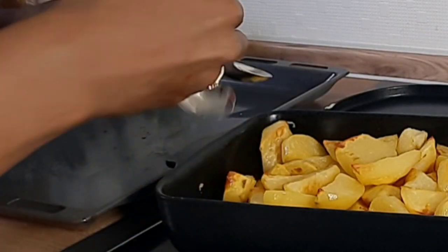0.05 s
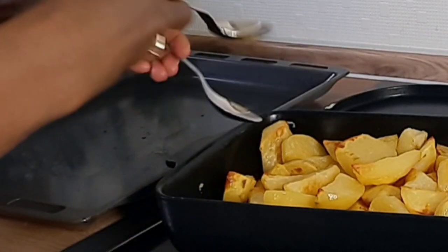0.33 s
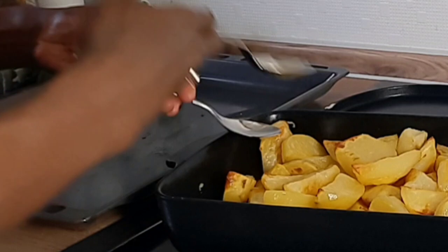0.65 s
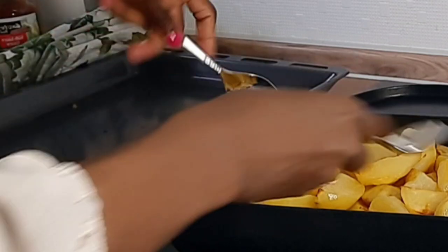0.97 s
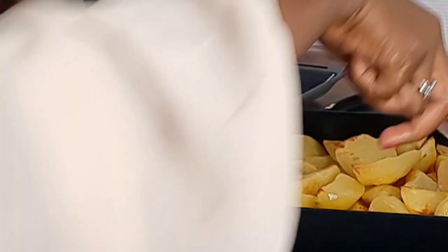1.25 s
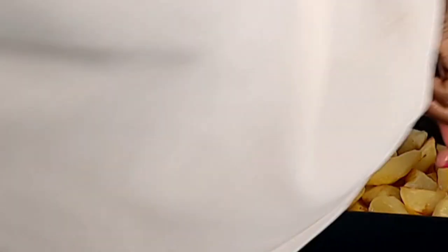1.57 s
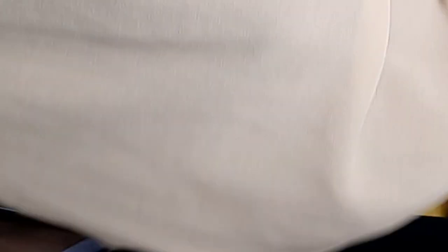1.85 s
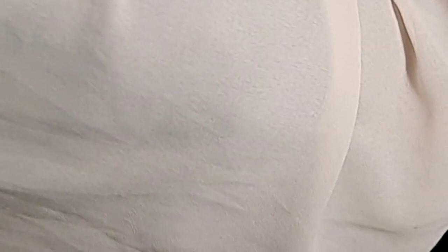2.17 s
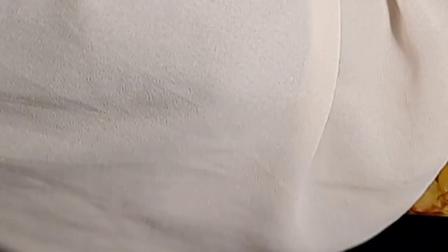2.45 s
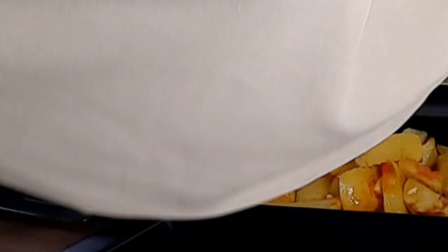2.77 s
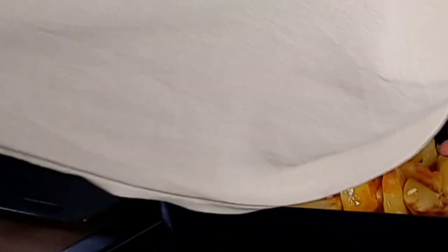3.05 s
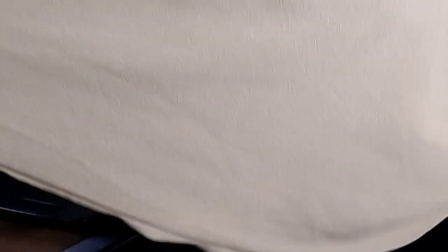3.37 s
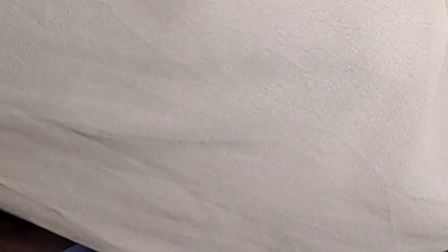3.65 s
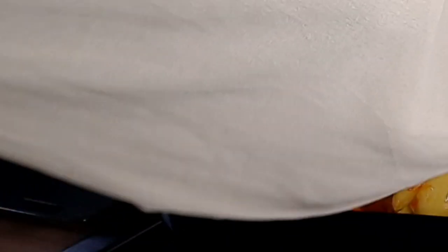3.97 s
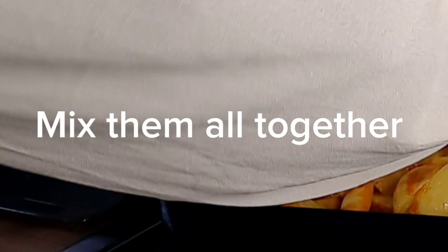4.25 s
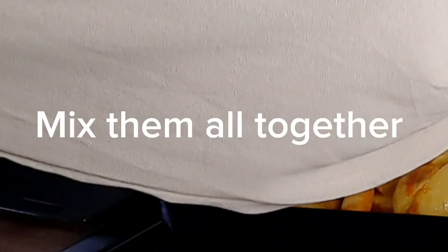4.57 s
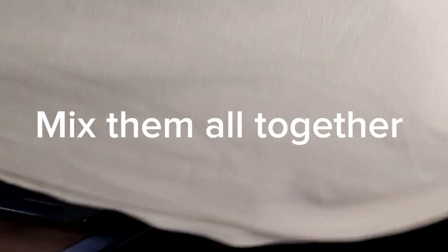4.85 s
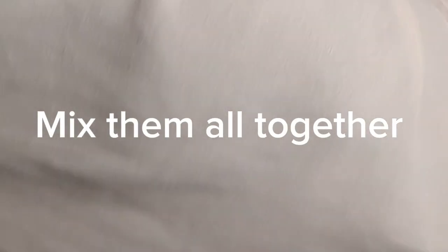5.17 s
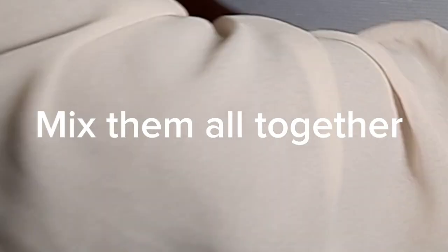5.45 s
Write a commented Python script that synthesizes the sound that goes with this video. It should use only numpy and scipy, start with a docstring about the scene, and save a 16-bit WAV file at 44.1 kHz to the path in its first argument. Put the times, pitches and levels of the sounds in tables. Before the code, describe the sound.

Two steel spoons clank and scrape in a metal oven tray, tossing roast potatoes in a small kitchen.

```python
"""Two steel spoons toss roast potatoes in a metal oven tray, in a small kitchen.
Each clank shakes the sheet metal and rings the tray and both spoons; crossing handles ring thinly.
Stick-slip pulses make the spoons scrape along the tray floor, and potatoes tumble and land softly.
The tray bumps once on the hob, which booms, and there is one sharp, thin snap.
Behind it are two faint sleeve swishes and a steady room tone."""
import sys
import numpy as np
from scipy import signal
from scipy.fft import rfft, irfft, next_fast_len
from scipy.io import wavfile
from scipy.ndimage import uniform_filter1d

SR = 44100
rng = np.random.default_rng(int(sys.argv[2]) if len(sys.argv) > 2 else 0)


def generate_wav(sig):
    """Save sig (samples, or channels by samples) to the path in sys.argv[1] as 16-bit PCM at SR."""
    pcm = np.round(np.clip(np.atleast_2d(sig).T, -1, 1) * 32767).astype(np.int16)
    wavfile.write(sys.argv[1], SR, pcm)


N = 242991
BLOW_TIME_S = np.arange(int(SR * .4), dtype=np.float32) / SR

# Spoon blows: (time [s], level [dB], place along wall [0-1], nominal tray t60 [s],
# knock trim [dB], clang trim [dB], first spoon trim [dB], second spoon trim [dB], treble trim [dB])
SPOON_BLOWS = [ (0.573, -14.5, .068, 0.35, -25, -3.5, -17.5, -17.5, -21.5),
               (0.656, -11.5, .06, 0.12, -30.5, -10, -16.5, -17, -23.5),
               (1.068, -28, .202, 0.26, -20.5, 10.5, -15, -37, -12.5),
               (1.254, -42.5, .06, 0.13, -32, 12.5, -10, -33, -30),
               (1.389, -23.5, .068, 0.2, -15, 3, -34, -38, -8),
               (1.452, -17.5, .43, 0.11, -23.5, -4, -15, -39, -25),
               (1.550, -13, .06, 0.2, -24, -9.5, -17, -42, -19),
               (2.709, -7.5, .332, 0.2, -28.5, 2.5, -8, -14, -13.5),
               (2.809, -7, .06, 0.3, -23.5, -19, .5, -24, -15),
               (2.900, -20, .066, 0.26, -19.5, -27, -6.5, -34, -16),
               (3.006, -10, .062, 0.076, -22.5, -15, -12.5, -17.5, -23.5),
               (3.167, -29.5, .06, 0.68, -48, 4, -32, -36, -17),
               (3.335, -28.5, 0, 0.12, -17, 0.5, -26, -34, -24),
               (4.408, -7.5, 0.23, 0.27, -25, -1.5, -9, -7, -29),
               (4.502, -16, .402, 0.072, -31.5, -5, -18, -11.5, -23.5),
               (4.589, -11, .292, 0.082, -34.5, -12, -16.5, -11.5, -39),
               (4.643, -24, .066, 0.18, -16, -17, -19, -30, -8),
               (4.726, -17.5, .074, 0.029, -15.5, -34, -32, -12.5, -20.5),
               (4.862, -23.5, .068, 0.055, -28, -36, -40, -10, -14),
               (5.282, -21.5, .058, .095, -28, -.5, -35, -42, -22)]
# Spoon and tray floor modes: (frequency [Hz], level [dB], t60 [s])
FIRST_SPOON_MODES = [(3104, 0, .25), (3130, -2, .17), (3340, -14, .2), (5608, -10, .14), (6710, -11, .25),
                     (6848, -15, .18), (7230, -13, .22), (8702, -22, .26), (10985, -23, .15),
                     (11990, -19, .15)]
SECOND_SPOON_MODES = [(2462, -7, .22), (3413, -6, .27), (4258, 0, .17), (4236, -5, .11), (5582, -8, .2),
                      (6675, -16, .22), (7300, -13, .2), (8200, -25, .18)]
FLOOR_MODES = [(338.8, -4.5, 0.18), (429.7, 2, .28)]
# Floor knock and contact crack spectra: (frequency [Hz], level [dB])
KNOCK_SPECTRUM = [(60, -15), (200, -11), (320, 1.5), (430, 0), (560, -8.5), (800, -11.5), (1400, -10),
                  (4000, -63.5)]
TREBLE_SPECTRUM = [(3000, -25.5), (7000, 8.5), (8300, 2), (9500, -9.5), (11500, 1), (13500, -7),
                   (15500, -8.5)]
def spoon_clanks():
    """Each contact cracks, shakes the sheet metal and rings the tray and both spoons."""
    out = np.zeros((2, N))
    metal = sheet_metal(ripple_db=7)
    swell = 1 - np.exp(-BLOW_TIME_S / 0.0005)  # ringing builds while the spoon chatters
    for time_s, db, place, t60_s, knock_db, clang_db, first_db, second_db, treble_db in SPOON_BLOWS:
        sheet = unit_onset(burst(metal, t60_s / 2) + amp(5.5) * burst(metal, t60_s=0.023))
        knock = unit_onset(burst(KNOCK_SPECTRUM, t60_s=0.14, attack_s=0.0026)
                           + amp(-6) * ring(FLOOR_MODES))
        treble = unit_onset(burst(TREBLE_SPECTRUM, t60_s=0.043))
        impact = amp(-8) * sheet + amp(knock_db) * knock + amp(treble_db) * treble
        impact = reverberate(impact, kitchen_tail(), wet_db=-2)
        clang = amp(clang_db - 10) * unit_onset(ring(struck_tray_modes(place, t60_s)))
        first = amp(first_db - 0.5) * unit_onset(ring(FIRST_SPOON_MODES))
        second = amp(second_db + 2.5) * unit_onset(ring(SECOND_SPOON_MODES))
        add(out, time_s, amp(db - 8.5) * (impact + swell * (clang + first + second)))
    return out


# Sheet metal spectrum: (frequency [Hz], level [dB])
SHEET_SPECTRUM = [(200, -32.5), (750, -16.5), (1100, 4), (1600, 0), (2500, 3), (3500, 2.5), (4800, -4.5),
                  (7200, -9), (8500, -43), (11000, -39)]
def sheet_metal(ripple_db):
    """The tray's crowded resonances, as random ripple on its broad spectrum."""
    hz = np.geomspace(200, 11000, 220)
    level_db = log_interp(SHEET_SPECTRUM, hz) + ripple_db * rng.standard_normal(len(hz))
    return np.transpose([hz, level_db])


# Tray wall modes: (frequency [Hz], level [dB], reference t60 [s])
TRAY_MODES = [(1030, -10, .2), (1135, -3, .25), (1219, -2, .22), (1285, -5, .2), (1402, 0, .24),
              (1470, 0, .22), (1525, -3, .22), (1870, -10, .16), (2080, -13, .15), (2400, -13, .2)]
def struck_tray_modes(place, t60_s, reference_t60_s=0.23):
    """A blow favours the modes that swing widely where it lands."""
    modes = []
    for half_waves, (hz, db, mode_t60_s) in enumerate(TRAY_MODES, start=4):
        coupling = 0.13 + abs(np.cos(np.pi * half_waves * place))
        modes.append((hz, db + 20 * np.log10(coupling), mode_t60_s * t60_s / reference_t60_s))
    return modes


# Spoon-on-spoon contacts: (time [s], level [dB])
HANDLE_CONTACTS = [(0.575, -25), (0.654, -26.5)]
# Handle modes: (frequency [Hz], level [dB], t60 [s])
HANDLE_MODES = [(3112, 0, .2), (3811, -15, .24), (4242, -6, .12), (5865, -11, .25), (10764, -22, .24),
                (11601, -17, .2), (15213, -20, .2)]
def handle_rings():
    """The spoons cross and set their thin handles ringing."""
    out = np.zeros((2, N))
    swell = 1 - np.exp(-BLOW_TIME_S / 0.0061)
    for time_s, db in HANDLE_CONTACTS:
        add(out, time_s, amp(db) * unit_onset(ring(HANDLE_MODES) * swell))
    return out


# Spoon pushes: (peak time [s], rise [s], fall [s], level [dB], hiss trim [dB], tumble trim [dB])
SPOON_STROKES = [ (1.2, 0.11, 0.29, -50.5, -24, -19), (1.721, 0.19, 0.27, -44.5, -12, -3),
                 (1.885, 0.12, 0.057, -33.5, 0, -17), (1.994, 0.3, 0.06, -40.5, -7, -12),
                 (2.27, 0.097, .36, -65, -6.5, -5), (2.69, 0.3, 0.15, -59.5, -0.5, -22),
                 (3.12, 0.038, 0.13, -40.5, -21, -26), (3.221, 0.1, 0.11, -35.5, 1.5, -41),
                 (3.265, 0.064, 0.096, -31, -14, -52), (3.50, 0.11, 0.1, -44, -15.5, -9),
                 (4.78, 0.038, 0.094, -40, -22, -14), (4.885, .11, 0.064, -34, -4.5, -10.5),
                 (5.182, 0.28, 0.25, -48.5, -9.5, -14.5), (5.38, 0.13, 0.6, -58.5, -2.5, -10.5)]
# Spoons rubbing in the food: (start [s], end [s])
RUB_SPANS = [(1.13, 3.58), (4.45, 7.7)]
def stroke_gains(drop_db=24, lift_s=0.079):
    """Scrape, hiss and tumble gains: each push swells and eases off over a light, steady rub."""
    t = np.arange(N) / SR
    in_food = sum(np.clip(np.minimum(t - start_s, end_s - t) / lift_s + 1, 0, 1)
                  for start_s, end_s in RUB_SPANS)
    power = np.outer(amp([-63, -68, -72]), in_food) ** 2
    for peak_s, rise_s, fall_s, db, hiss_db, tumble_db in SPOON_STROKES:
        push = amp(db - drop_db * np.maximum((peak_s - t) / rise_s, (t - peak_s) / fall_s))
        power += np.outer([1, amp(hiss_db), amp(tumble_db)], push) ** 2
    return np.sqrt(power)


# Scraped tray resonances: (frequency [Hz], bandwidth [Hz], level [dB])
SCRAPE_RESONANCES = [(990, 95, -1), (1850, 350, -3.5), (2604, 150, -3.5), (2892, 35, -2), (3080, 60, -3),
                     (3412, 36, -4.5), (3750, 90, -6), (4170, 46, -6), (4470, 130, -8), (4770, 190, -11.5),
                     (6540, 20, -21), (6410, 77, -8), (7090, 29, -31.5), (7380, 47, -10)]
# Scrape hiss spectrum: (frequency [Hz], level [dB])
HISS_SPECTRUM = [(2500, -29.5), (5000, 3.5), (6000, 2.5), (7300, 3), (9300, -21), (11000, -7),
                 (15500, -15.5)]
def spoon_scrapes():
    """A dragged spoon's slips ring the tray floor; potatoes roll ahead of it."""
    scrape_gain, hiss_gain, tumble_gain = stroke_gains()
    grit = moving_contact(stick_slip(rate_hz=600, spread_db=3.3), depth_db=5.5)
    metal = unit_rms(filtered(grit, lambda hz: resonances(SCRAPE_RESONANCES, hz)))
    scrape = scrape_gain * (amp(-3) * metal + amp(-23) * coloured(grit, KNOCK_SPECTRUM))
    hiss = amp(-4) * hiss_gain * coloured(grit, HISS_SPECTRUM)
    tumble = tumble_gain * coloured(stick_slip(rate_hz=60, spread_db=2), POTATO_SPECTRUM)
    return reverberate(scrape + hiss + tumble, kitchen_tail(), wet_db=-3.5)


def stick_slip(rate_hz, spread_db, rub_gain=.4):
    """Irregular friction pulses of uneven size over a smooth rub."""
    slips = rng.random(N) < rate_hz / SR
    sizes = amp(spread_db * np.minimum(rng.exponential(size=N), 4))
    pulses = unit_rms(slips * sizes * rng.choice([-1, 1], (2, N)))
    return diffuse(pulses + rub_gain * rng.standard_normal((2, N)))


def moving_contact(x, depth_db):
    """The moving contact favours changing resonances: random gain over frequency and time."""
    spectra = signal.stft(x, nperseg=1024)[2]
    patches = uniform_filter1d(rng.standard_normal(spectra.shape[1:]), size=3, axis=0)
    patches = unit_rms(uniform_filter1d(patches, size=4, axis=1))
    return unit_rms(signal.istft(spectra * amp(depth_db * patches), nperseg=1024)[1][:, :N])


# Potato landings: (time [s], level [dB])
POTATO_LANDINGS = [(1.573, -37), (3.03, -47.5), (3.146, -49), (3.35, -48.5), (4.441, -54), (4.652, -53),
                   (4.74, -56.5), (4.79, -53.5)]
# Potato thud and tumble spectrum: (frequency [Hz], level [dB])
POTATO_SPECTRUM = [(30, -31.5), (75, 1), (150, -3.5), (230, -4.5), (330, 2.5), (500, -5.5), (900, -10.5),
                   (3000, -34)]
def potato_thuds():
    """Soft potatoes drop onto the tray floor."""
    out = np.zeros((2, N))
    for time_s, db in POTATO_LANDINGS:
        thud = burst(POTATO_SPECTRUM, t60_s=0.22, attack_s=0.0012)
        add(out, time_s, amp(db) * unit_onset(reverberate(thud, kitchen_tail(), wet_db=0.5)))
    return out


# Hob modes: (frequency [Hz], level [dB], t60 [s])
HOB_MODES = [(75, 2, .27), (88, 7.5, .17), (121, 0, .35), (152, 2, .26), (188, -1, .25), (262, -7, .15),
             (303, -8, .45), (328, 3, .17), (452, -20, .24), (553, -4.5, .2), (736, -4, .2),
             (780, 3.5, .11)]
# Tray-on-hob clack spectrum: (frequency [Hz], level [dB])
CLACK_SPECTRUM = [(45, -33.5), (88, -1), (150, -22), (222, -11.5), (303, -8.5), (354, -12.5), (805, -15.5),
                  (905, -15), (1830, -19.5), (2400, -23), (3840, -23), (9260, -35), (14200, -24.5),
                  (16000, -66.5)]
def hob_bump(time_s=0.725, radiation_cutoff_hz=68):
    """The loaded tray knocks on the hob, which booms; a brief hiss follows as it slides."""
    out = np.zeros((2, N))
    tail = kitchen_tail()
    boom = ring(HOB_MODES, scatter_db=1.5) * (1 - np.exp(-BLOW_TIME_S / 0.0036))
    boom = highpass(boom, radiation_cutoff_hz, order=5)
    clack = burst(CLACK_SPECTRUM, t60_s=0.21) + amp(1.5) * burst(CLACK_SPECTRUM, t60_s=0.0055)
    contact = burst([(250, -16.5), (800, 1), (3000, 2), (7000, -20), (11000, -45.5)], t60_s=0.04)
    slide = burst([(6000, -27), (11000, -2), (14000, -0.5)], t60_s=0.22, attack_s=.02)
    add(out, time_s, amp(-20.5) * unit_onset(reverberate(boom, tail, wet_db=-22)))
    add(out, time_s, amp(-23) * unit_onset(reverberate(clack, tail, wet_db=1.5)))
    add(out, time_s, amp(-25) * unit_onset(contact))
    add(out, time_s + 0.012, amp(-31) * unit_onset(slide))
    return out


# Snap spectrum: (frequency [Hz], level [dB])
SNAP_SPECTRUM = [(410, -70), (700, -44), (922, -28), (1080, -33), (1480, -23), (2000, -27), (2530, -10),
                 (2770, -10.5), (3550, 0), (4380, -15), (7010, -10), (9480, -21), (14600, -13),
                 (16000, -20)]
def snap(time_s=3.803):
    """A thin, very short snap that leaves a faint ring."""
    out = np.zeros((2, N))
    crack = burst(SNAP_SPECTRUM, t60_s=0.1) + amp(-7) * burst(SNAP_SPECTRUM, t60_s=0.15)
    crack = unit_onset(reverberate(crack, kitchen_tail(), wet_db=-3))
    ringing = ring([(2660, -12.5, 0.9), (3219, 9.5, 0.32), (3580, -4, 0.66), (5650, -6, 0.43)])
    add(out, time_s, amp(-33.5) * crack + amp(-49.5) * ringing)
    return out


# Sleeve swishes: (peak time [s], half-width [s], level [dB])
SLEEVE_SWISHES = [(0.103, 0.066, -69.5), (0.365, 0.051, -72.5)]
def sleeve():
    """Cloth brushes faintly as the arm reaches out."""
    t = np.arange(N) / SR
    envelope = sum(amp(db) * np.exp(-((t - peak_s) / half_s) ** 2)
                   for peak_s, half_s, db in SLEEVE_SWISHES)
    cloth_spectrum = [(1000, -9), (3000, -11), (5000, -2), (8000, -2), (9500, -13), (15000, -8)]
    return envelope * coloured(rng.standard_normal((2, N)), cloth_spectrum)


# Kitchen decay: (frequency [Hz], t60 [s])
KITCHEN_DECAY = [(80, .35), (400, 0.31), (1500, 0.35), (4000, 0.33), (8000, 0.33), (15000, 0.29)]
def kitchen_tail():
    """Room impulse response of about unit energy: diffuse noise, decaying band by band."""
    hz, t, spectra = signal.stft(rng.standard_normal((2, len(BLOW_TIME_S))), SR, nperseg=256)
    decay = amp(-60 * t / log_interp(KITCHEN_DECAY, hz)[:, None])
    tail = signal.istft(spectra * decay, SR, nperseg=256)[1][:, :len(BLOW_TIME_S)]
    tail = diffuse(tail * (1 - np.exp(-BLOW_TIME_S / 0.0035)))
    return tail / np.linalg.norm(tail[0])


# Background spectrum: (frequency [Hz], level [dB])
ROOM_SPECTRUM = [(15, -60), (25, -26.5), (87, -7.5), (120, -12), (149, -22.5), (190, -14), (256, -15),
                 (363, -5.5), (641, -17.5), (1070, -23), (1440, -27), (1610, -18.5), (1940, -31),
                 (2110, -26.5), (16000, -48)]
def room_tone():
    """The kitchen's faint, steady background."""
    return amp(-68.5) * coloured(diffuse(rng.standard_normal((2, N))), ROOM_SPECTRUM)


# Diffuse field: (frequency [Hz], left-right coherence [0-1])
STEREO_COHERENCE = [(100, 0.96), (250, 0.88), (600, 0.7), (1500, 0.16), (4000, 0.0022), (12000, 0)]
def stereo_angle_rad(hz):
    """Mid-side angle: channels alike in the bass, unrelated in the treble."""
    return np.arccos(np.clip(log_interp(STEREO_COHERENCE, hz), -1, 1)) / 2


def diffuse(pair):
    """Mix two unrelated signals into a diffuse stereo field."""
    mid = filtered(pair[0], lambda hz: np.cos(stereo_angle_rad(hz)))
    side = filtered(pair[1], lambda hz: np.sin(stereo_angle_rad(hz)))
    return np.array([mid + side, mid - side])


def ring(modes, scatter_db=0.0):
    """Struck modes (frequency [Hz], level [dB], t60 [s]), drifting in phase in each channel."""
    hz, db, t60_s = np.array(modes, np.float32).T[:, :, None]
    db = db + scatter_db * rng.standard_normal(db.shape, dtype=np.float32)
    envelopes = amp(db - 60 * BLOW_TIME_S / t60_s)
    angle_rad = stereo_angle_rad(hz) * rng.choice([-1, 1], hz.shape)
    start_rad = np.array([angle_rad, -angle_rad]) + np.pi * rng.integers(2, size=hz.shape)
    drift_rad = np.float32(angle_rad) * phase_drift(len(hz))
    return (envelopes * np.sin(2 * np.pi * hz * BLOW_TIME_S + np.float32(start_rad) + drift_rad)).sum(1)


def phase_drift(mode_count, rate_hz=70):
    """Random drift per channel and mode, growing as reflections take over."""
    knots = np.arange(BLOW_TIME_S[-1] * rate_hz + 1, dtype=np.float32)[:, None]
    weights = np.maximum(0, 1 - abs(BLOW_TIME_S * rate_hz - knots))
    drift = rng.standard_normal((2, mode_count, len(knots)), dtype=np.float32) @ weights
    return drift * (1 - np.exp(-BLOW_TIME_S / .02))


def burst(spectrum, t60_s, attack_s=0.00036):
    """Countless overlapping modes dying together, as shaped noise."""
    noise = diffuse(rng.standard_normal((2, len(BLOW_TIME_S))))
    envelope = amp(-60 * BLOW_TIME_S / t60_s) * (1 - np.exp(-BLOW_TIME_S / attack_s))
    return coloured(noise, spectrum) * envelope


def resonances(modes, hz):
    """Response of damped resonators of alternating polarity."""
    return sum((-1) ** k * amp(db) * 1j * hz * width_hz / (mode_hz ** 2 - hz ** 2 + 1j * hz * width_hz)
               for k, (mode_hz, width_hz, db) in enumerate(modes))


def reverberate(x, tail, wet_db):
    """Direct sound plus reflections."""
    return x + amp(wet_db) * signal.fftconvolve(x, tail, axes=1)[:, :x.shape[1]]


def coloured(x, spectrum):
    """Shape x by (frequency [Hz], level [dB]) points, at rms 1."""
    return unit_rms(filtered(x, lambda hz: amp(log_interp(spectrum, hz))))


def filtered(x, response):
    """Apply a frequency response by FFT."""
    length = x.shape[-1]
    padded = next_fast_len(length + 4096)
    return irfft(rfft(x, padded) * response(np.fft.rfftfreq(padded, 1 / SR)), padded)[..., :length]


def highpass(x, cutoff_hz, order):
    return signal.sosfilt(signal.butter(order, cutoff_hz, "highpass", fs=SR, output="sos"), x)


def log_interp(points, hz):
    points_hz, values = np.transpose(points)
    return np.interp(np.log(hz + 1), np.log(points_hz + 1), values)


def amp(db):
    return np.exp(np.asarray(db) * float(np.log(10) / 20))


def unit_rms(x):
    return x / np.sqrt(np.mean(x ** 2) + 1e-20)


def unit_onset(x):
    """Scale to rms 1 over the first 40 ms."""
    return x / np.sqrt(np.mean(x[:, :SR // 25] ** 2))


def add(track, time_s, x):
    part = track[:, round(time_s * SR):][:, :x.shape[1]]
    part += x[:, :part.shape[1]]


def scene():
    """Stereo mix, with the tray a little to the left."""
    tray = spoon_clanks() + handle_rings() + spoon_scrapes() + potato_thuds()
    around = hob_bump() + snap() + sleeve() + room_tone()
    return tray * amp([[1.8], [-1.8]]) + around * amp([[1], [-1]])


def record(dry):
    """Cut the deepest bass, round the tallest peaks and limit the band."""
    ceiling, top_hz = .95, 15900
    trimmed = highpass(dry, cutoff_hz=42, order=6)
    rounded = trimmed / (1 + (trimmed / ceiling) ** 4) ** .25
    return filtered(rounded, lambda hz: 1 / np.sqrt(1 + (hz / top_hz) ** 120))


dry = scene()
out = record(dry)
generate_wav(out)
```